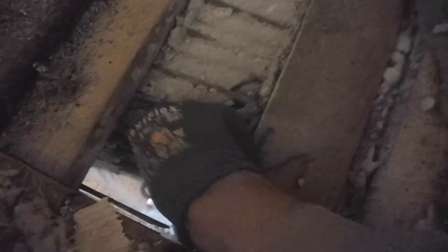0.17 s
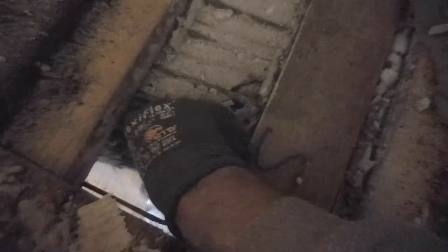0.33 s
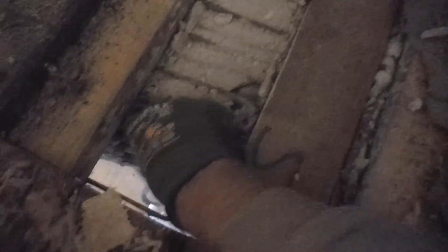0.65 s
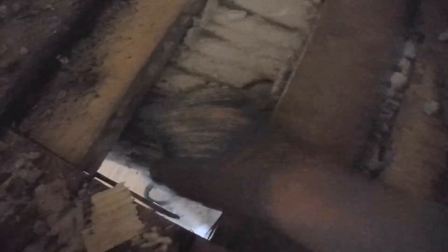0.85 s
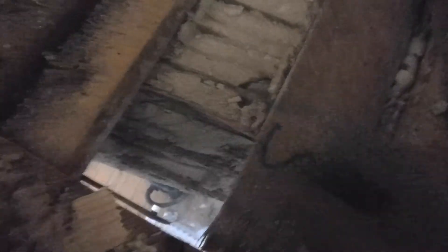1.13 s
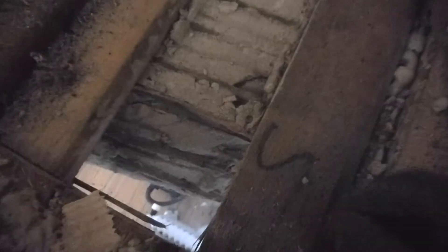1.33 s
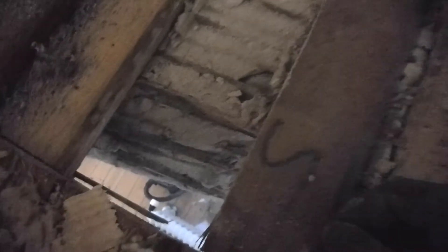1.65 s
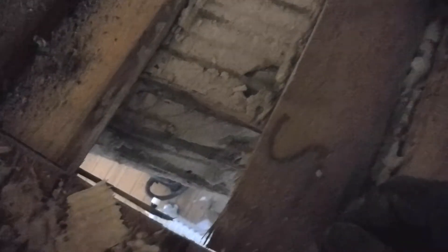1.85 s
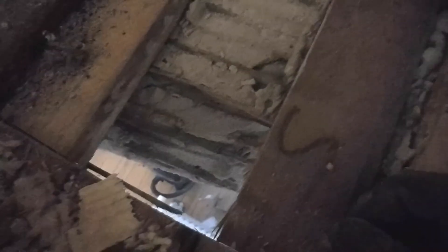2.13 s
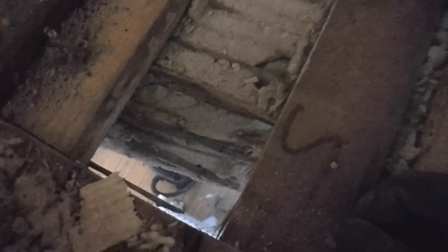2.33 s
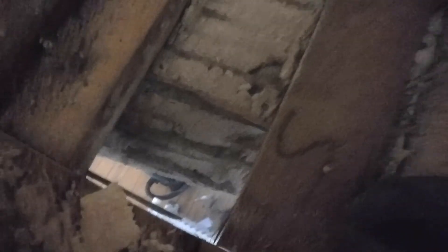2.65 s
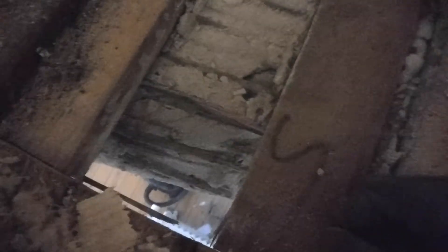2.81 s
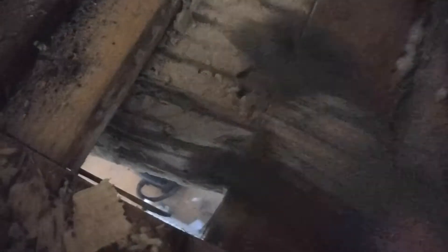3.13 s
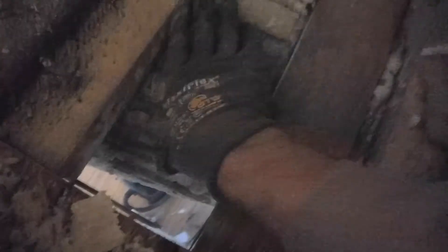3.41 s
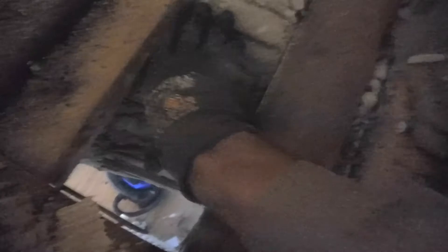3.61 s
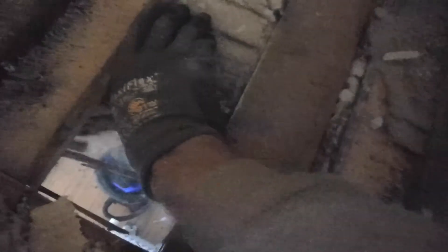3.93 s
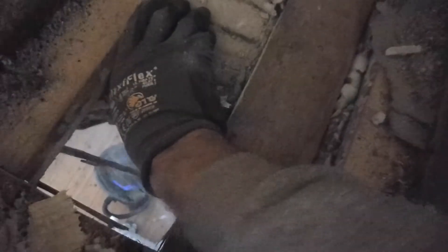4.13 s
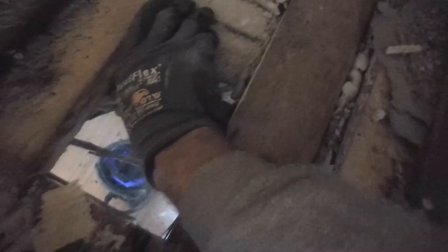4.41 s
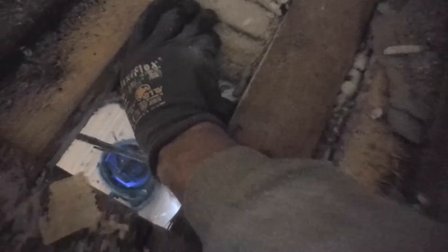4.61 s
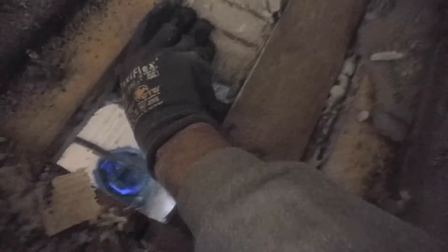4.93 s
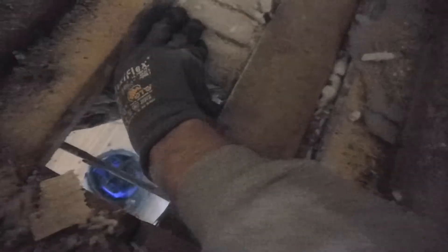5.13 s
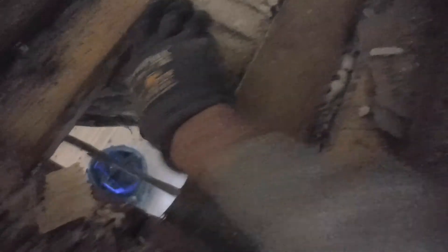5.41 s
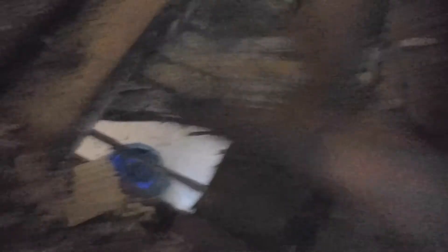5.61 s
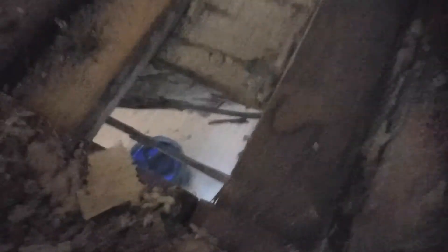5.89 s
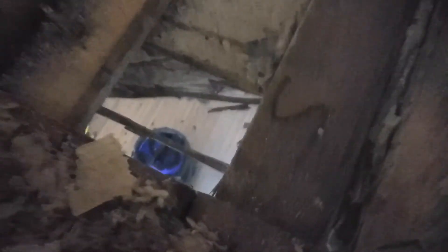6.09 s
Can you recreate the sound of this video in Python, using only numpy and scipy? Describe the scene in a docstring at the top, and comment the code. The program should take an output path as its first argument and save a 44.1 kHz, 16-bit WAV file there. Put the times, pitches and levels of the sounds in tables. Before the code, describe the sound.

Close, sharp snaps and dry crumbling open abruptly as a gloved hand breaks old plaster from laths in an attic. Debris then drops through a hole and clatters in a bare, echoing room below. After a quieter pause, soft joist thumps and a glove scrape lead into a second, denser burst of cracking, more falling chips with a brief hard clang, then scattered snaps and a last trickle. The close microphone hears the hand leaning slightly right.

```python
"""Sharp snaps and dry crumbling come first, close to the microphones: in an attic, a gloved hand breaks
old plaster and insulation out of the laths. Bursts, short modes and showers of tiny rings make these.
Debris drops through the hole into the bare room below: scattered hits, coloured and drawn out by echoes.
Now and then a sleeve brushes or the glove scrapes, as shaped noise and stick-slip clicks; joists thump
softly as the body leans. Quick attic reflections surround the near work, over a faint bed of air noise."""
import sys
import numpy as np
from scipy import signal
from scipy.fft import rfft, irfft
from scipy.io import wavfile
from scipy.ndimage import uniform_filter1d

SR = 44100
rng = np.random.default_rng(int(sys.argv[2]) if len(sys.argv) > 2 else 0)


def persist_wave(psi):
    """Save psi, clipped to +-1, as 16-bit WAV."""
    counts = np.round(np.clip(psi, -1, 1) * 32767).astype(np.int16)
    wavfile.write(sys.argv[1], SR, np.atleast_2d(counts).T)


N = 275669
TIME = np.arange(N) / SR
CUTOFF_HZ = 16300   # nothing is kept above this

# Flakes that follow a snap: mean delay, level re the snap, middle pitch
FLAKE_DELAY_S, FLAKE_DB, FLAKE_HZ = .018, -20.5, 8300
LATH_SHARE = 0.414   # the lath knock lies this far from the crack's level towards the joist's
# Pieces snapping at the hand, close by; levels are relative.
# Columns: t/s, crack/dB, treble shelf re crack/dB, joist thump/dB, ring of the piece f/Hz, ring height/dB
SNAP_EVENTS = [(0.02, 6, -6, 10, 8980, 5), (0.0246, 5.5, -3.5, -22.5, 5060, -1),
               (0.0394, 9, -11, 5.5, 3410, -1.5), (.0422, 4, -3.5, 4.5, 11170, 8),
               (0.0487, -6.5, 4, 1.5, 9970, 2.5), (.068, -8, -15.5, -4, 2170, 9),
               (0.0806, -6.5, 17, -1.5, 7540, 0), (.09, 9, -8.5, 2.5, 2794, 6.5),
               (0.1533, -1, -2, -15.5, 9550, 3), (0.1768, 11.5, -3.5, 11.5, 2299, 20),
               (0.1945, -6.5, 6, 2.5, 10000, 5), (0.1987, -16, 10, -3.5, 7360, 19),
               (0.2631, -2, 3.5, -3.5, 6598, -1), (0.3143, -15, 5, -35, 9040, 12),
               (0.3777, -7, -7, -37.5, 2930, 8), (0.495, -10, 1, -8.5, 8790, 17),
               (.545, -17, 11, -30, 10000, 13), (0.5994, 2, -2.5, -16, 7110, 4),
               (0.813, -11.5, 1.5, -25, 2985, 11), (1.964, -9.5, -1, -19.5, 2425, 10.5),
               (2.409, -28.5, 1.5, -40, 4640, 3.5), (3.2626, -8, -6, -34, 2078, 15),
               (3.403, -1.5, 1, 4.5, 8680, 8.5), (3.44, 1.5, -2.5, -0.5, 9140, 5.5),
               (3.4525, -6.5, 6, -11, 9580, 1), (3.5253, 4.5, -6, 6, 3560, 2),
               (3.5288, -3, 5.5, -1, 8700, 7), (3.5835, -6, -6.5, -18.5, 3256, 8),
               (3.6886, 2.5, -6.5, -6.5, 2912, 9), (3.7191, 5.5, -7.5, -1, 5560, 15.5),
               (3.773, -4, 3.5, -28, 9200, 7), (3.7779, -2, 3.5, -30, 5920, 3.5),
               (3.7845, -5, 9, -4.5, 8450, 5), (3.8077, 4, 0, 11.5, 3750, 3.5),
               (3.8287, 3, 3, 6.5, 2952, 11), (3.8453, 4.5, -3.5, 9, 1274, 13),
               (3.8633, 6.5, -1, -4.5, 4040, 7), (3.8679, 9.5, 1.5, 12, 1366, 11),
               (3.8892, 8, -4, 11, 9220, 9), (3.912, -4, 13.5, 10.5, 6500, -11.5),
               (3.9475, 8.5, -8, 7, 3414, 4.5), (3.9693, 7, -5.5, 5, 3475, 8.5),
               (4.0371, -8.5, 2.5, -28.5, 3340, 17.5), (4.0983, -12.5, 13, -11, 8600, -0.5),
               (4.2372, -6.5, -13, -34, 3960, 8), (4.245, 1, -14.5, -24.5, 3990, -10.5),
               (4.271, -1.5, -2.5, -9, 8890, -0.5), (4.3024, -9.5, 6, 3.5, 9230, 7),
               (4.3163, -1.5, -21, -5.5, 1452, 10.5), (4.3316, 3.5, -18, -9.5, 2920, -13.5),
               (4.359, -11.5, 4, -30.5, 3400, 8), (4.5946, 3.5, -10.5, -11.5, 4370, 3.5),
               (5.0027, -8.5, 4.5, -25.5, 2230, 13.5), (5.0625, 1.5, -9, -6, 7640, 5),
               (5.0992, 4, -8.5, -36.5, 2967, 7), (5.215, -19, 11, -37, 8700, 3),
               (5.2411, 0, 1.5, 1, 2406, 13.5), (5.7085, 2.5, -15.5, -44, 1473, 8.5)]


def snaps(crack_db=-2.5, knock_db=-15, thump_db=3, thump_t60=0.03, size=3000):
    """A fracture cracks and rings the piece, knocks the laths, thumps the joist and sheds a flake."""
    out, t = np.zeros((2, N)), np.arange(size) / SR
    for s, db, treble_db, joist_db, ring_hz, ring_db in SNAP_EVENTS:
        piece = from_db(db + crack_db) * crack(t, treble_db, ring_hz, ring_db)
        piece += from_db(db + PIECE_RING_DB + .5 * ring_db) * piece_ringing(t, ring_hz)
        lath_db = db + LATH_SHARE * (joist_db - db)
        knock = from_db(lath_db + knock_db) * lath_knock(t)
        blow = from_db(joist_db + thump_db) * thump(t, thump_t60)
        add(out, s, piece + knock + blow)

        flake_hz = FLAKE_HZ * 2 ** (rng.random() - .5)
        flake = crack(t, treble_db=-6, ring_hz=flake_hz, ring_db=7.5)
        delay = FLAKE_DELAY_S * (.5 + rng.random())
        add(out, s + delay, from_db(db + FLAKE_DB) * flake)
    return out


# A piece that rings higher dies sooner: reference pitch, its decay, and how decay follows pitch
PIECE_HZ, PIECE_T60_S, T60_OCTAVES_PER_OCTAVE = 3000, 0.0183, -.33
# Basic colour of a crack. Columns: f/Hz, relative level/dB
CRACK_SPECTRUM = [(100, -26.5), (700, -1), (1600, -1), (4000, 3.5), (9500, 0.5), (12500, -5), (16000, -19)]


def crack(t, treble_db, ring_hz, ring_db, ring_share=0.337, rise_s=0.00031):
    """A fast-opening, decaying noise burst rings the piece in a close pair of resonances."""
    t60 = PIECE_T60_S * (ring_hz / PIECE_HZ) ** T60_OCTAVES_PER_OCTAVE
    opening = (1 - np.exp(-t / rise_s)) * from_db(-60 * t / t60)
    burst = unit_energy(stereo_noise(len(t), NEAR_LIKENESS) * opening)
    width = ring_share * ring_hz
    pair = [(ring_hz, width, ring_db), (1.2 * ring_hz, .5 * width, 0.11 * ring_db)]
    return coloured(burst, CRACK_SPECTRUM, pair, treble_db + 1.5, size=1024)


PIECE_RING_CYCLES, PIECE_RING_DB = 65, -16.5   # cycles to fall 60 dB; base level re the crack
# Modes of a broken piece. Columns: multiple of its pitch, relative level/dB
BROKEN_PIECE_MODES = [(1, 1), (1.38, -3), (2.48, -5)]


def piece_ringing(t, ring_hz):
    """The loose piece rings on for a moment, each mode dying after the same number of cycles."""
    modes = []
    for multiple, db in BROKEN_PIECE_MODES:
        hz = ring_hz * multiple
        if hz < CUTOFF_HZ:
            modes.append((hz, db, PIECE_RING_CYCLES / hz))
    return ringing(modes, t)


# Modes of the laths. Columns: f/Hz, relative level/dB, t60/s
LATH_MODES = [(378.7, -4, 0.0556), (376.1, -4.5, 0.0833), (518.5, -2.5, 0.056), (571.9, -1.5, 0.068),
              (638, 0, 0.033), (828.2, 2.5, 0.0483), (1004.3, 3.5, 0.023), (1176, -4, 0.0256),
              (1530, 3, 0.013)]


def lath_knock(t):
    """The struck laths sound their short modes, a little detuned at each blow."""
    return ringing(LATH_MODES, t, detune=.06)


# Dull colour of the joist. Columns: f/Hz, relative level/dB
THUMP_SPECTRUM = [(15, -5.5), (40, -5), (80, -5), (140, -6.5), (230, -3.5), (400, -11.5), (1000, -31.5),
                  (4000, -71)]


def thump(t, t60):
    """A dull blow carried by the joist."""
    blow = stereo_noise(len(t), 0.06) * from_db(-60 * t / t60)
    return coloured(unit_energy(blow), THUMP_SPECTRUM)


# Colour of the crumbs. Columns: f/Hz, relative level/dB
CRUMB_SPECTRUM = [(30, -2.5), (130, -11.5), (260, -4.5), (400, 6.5), (1100, 6.5), (2000, 3.5), (3800, 3),
                  (6000, 1.5), (9500, 4.5), (12500, 0.5), (16000, -18.5)]


def crumbling(per_s=1000, spread_db=3.5, grain_t60=0.007, level_db=-1, count=6, size=400):
    """Crumbs break one by one, more as the hand pulls harder; each size has its own short ring."""
    db = crumbling_db()
    rate = per_s * from_db(0.82 * (db + 44))
    t, out = np.arange(size) / SR, 0
    for hz in np.geomspace(2200, 10500, count):
        tick = stereo_noise(size, NEAR_LIKENESS) * from_db(-60 * t / grain_t60)
        resonance = [(hz, 0.56 * hz, 10)]
        tick = unit_energy(coloured(tick, [(100, 0.0044), (16000, 0.0043)], resonance, size=512))
        breaks = grains(N, rate / count, spread_db)[None]
        out = out + signal.oaconvolve(breaks, tick, axes=-1)[:, :N]
    return coloured(evened(out, size=2000) * from_db(db + level_db), CRUMB_SPECTRUM)


CRUMBLE_GAIN_DB, TRICKLE_DB_PER_S2 = 5, 10.5   # after a pull the crumbs trickle away, ever faster
CRUSH_RISE_DB_PER_S, CRUSH_FALL_DB_PER_S = 248, 120
# Plaster crumbling under the fingers, one list a pull. Columns: t/s, relative level/dB
CRUMBLE_PULLS = [
    [(0.0, -43.5), (0.11, -55), (0.234, -60.5), (0.404, -52.5), (0.508, -56), (0.668, -49.5), (0.806, -47),
     (0.95, -53.5)],
    [(3.15, -69), (3.242, -69), (3.374, -62.5), (3.462, -50.5), (3.574, -45.5), (3.88, -47), (4.068, -58),
     (4.314, -50), (4.43, -57)],
    [(4.9, -58), (5.084, -50), (5.356, -56), (5.522, -64.5), (5.732, -64.5), (5.902, -57.5), (6.2, -64.5)],
]
# Lumps crushed in the fist. Columns: t/s, relative level/dB
FIST_CRUSHES = [(0.209, -35), (3.888, -23.5), (4.161, -40.5)]


def crumbling_db():
    """The loudest of the pulls, their trickles and the crushed lumps sets the level at each moment."""
    levels = []
    for rows in CRUMBLE_PULLS:
        pull = np.interp(TIME, *np.transpose(rows), left=-100) + CRUMBLE_GAIN_DB
        since_end = np.maximum(TIME - rows[-1][0], 0)
        levels.append(pull - TRICKLE_DB_PER_S2 * since_end ** 2)
    for s, db in FIST_CRUSHES:
        levels.append(db - np.maximum(CRUSH_RISE_DB_PER_S * (s - TIME), CRUSH_FALL_DB_PER_S * (TIME - s)))
    return np.max(levels, axis=0)


NEAR_LIKENESS = 0.1   # left-right likeness of the close noises before they are placed
# How the work of the hand reaches the microphones. Columns: f/Hz, side re mid level/dB
HAND_WIDTH = [(100, -0.5), (700, -8), (2000, -5.5), (4500, -3.5), (8000, -1)]
# Columns: f/Hz, left re right level/dB
HAND_PAN = [(100, -4), (1200, -5), (3500, -7), (7000, -1), (13000, -1.5)]


def at_the_hand(x):
    """Close sounds reach both sides alike in the middle range, leaning right; their treble is diffuse."""
    mid = (x[:1] + x[1:]) / 2
    side = coloured((x[:1] - x[1:]) / 2, HAND_WIDTH, size=512)
    left = coloured(mid + side, [(hz, db / 2) for hz, db in HAND_PAN], size=512)
    right = coloured(mid - side, [(hz, -db / 2) for hz, db in HAND_PAN], size=512)
    return np.vstack([left, right])


# Debris landing below; levels are relative. Columns: t/s, scatter time/s, first hit re scatter/dB,
# heavy lump level/dB, chips level/dB, fine grit level/dB
DEBRIS_FALLS = [(.295, 0.0187, 2, 1, -1.5, -30.5), (.459, 0.0052, -6, -20.5, 1, 0.5),
                (.75, 0.041, -21.5, -2, -12.5, 2), (.83, 0.00457, -14.5, 5, 12.5, 0),
                (.992, 0.0074, -4, 0.5, 10, 12.5), (1.015, 0.0036, 4.5, -19.5, 10.5, 4.5),
                (1.121, 0.23, -19, -7, 0, 8.5), (1.247, .022, -13.5, -0.5, -3, -2.5),
                (1.321, 0.0234, -21, -15.5, -12, 6.5), (1.346, 0.0116, -9, 3, 7, 15.5),
                (1.405, 0.00286, 5.5, 14, 17, -9), (1.6377, 0.021, 10.5, 33, 16, 2),
                (1.905, 0.0324, 0.5, -2, 2.5, 1), (2.218, 0.0051, 11, -15, -25.5, -9.5),
                (4.438, 0.01015, 2.5, -23, -4, 11.5), (4.501, 0.0083, -2.5, -19, 19, 13),
                (4.59, 0.103, -10, 14, 17, 21), (4.681, 0.0102, 0, 9.5, 23, 17),
                (4.96, 0.0641, -11, -6, 2.5, -20.5), (5.404, 0.0127, 5.5, 1.5, 9.5, 3.5),
                (5.418, 0.0049, 0.5, -20.5, 10, 7), (6.205, 0.0084, 6, -2, -14.5, 10)]
# Colours of the three kinds of debris. Columns: f/Hz, relative level/dB
LUMP_SPECTRUM = [(25, -62.5), (90, -35), (180, -21.5), (330, -16.5), (520, -7), (800, 1), (1080, 3),
                 (1500, 0), (2300, -6.5), (3500, -19.5), (6000, -32), (15000, -56.5)]
CHIP_SPECTRUM = [(40, -55.5), (250, -26), (450, -11), (800, -9), (1150, -5), (2200, 0), (3800, -4.5),
                 (6000, -22), (15000, -51)]
GRIT_SPECTRUM = [(40, -41), (300, -20), (650, -18.5), (2000, -8.5), (3800, -1.5), (6500, -10.5),
                 (9500, -11), (12500, -17.5), (15500, -39.5)]
# Resonances of the hole and the joist bay. Columns: f/Hz, width/Hz, level/dB
BAY_RESONANCES = [(503, 27, -0.5), (775, 64, 0.5), (940, 25.3, 0.5), (1104, 50, 1), (1118.8, 54, 4),
                  (2166, 93, 2)]


def falling_debris(per_s=1200, direct_db=-13, level_db=-1, size=12000):
    """Each handful hits the floor and scatters: lumps thud, chips clatter, grit hisses."""
    t, out = np.arange(size) / SR, np.zeros((2, N))
    for k, spectrum in enumerate([LUMP_SPECTRUM, CHIP_SPECTRUM, GRIT_SPECTRUM]):
        hits = np.zeros((1, N))
        for s, scatter, first_db, *levels_db in DEBRIS_FALLS:
            fading = np.exp(-t / (2 * max(scatter, .002)))
            shower = unit_energy(grains(size, per_s, 9.7) * fading)
            shower[0] += from_db(first_db - 4.4 * k)   # finer stuff has a weaker leading hit
            add(hits, s, from_db(levels_db[k]) * unit_energy(shower))
        path = room_below()   # each kind has its own pattern of echoes
        path[:, :1] += panned(from_db(direct_db), -2)
        out += signal.fftconvolve(hits, coloured(path, spectrum, BAY_RESONANCES), axes=-1)[:, :N]
    return from_db(level_db) * (out + clangs())


# Chips striking something hard below. Columns: t/s, relative level/dB
CLANG_EVENTS = [(4.5, -1), (4.681, 10.5), (5.416, -14)]
# Modes of that hard thing on the floor. Columns: f/Hz, relative level/dB, t60/s
HARD_THING_MODES = [(1126, 2.5, 0.575), (1209.6, 2.5, 0.39), (1422, 14.5, 0.0484), (1609, 7, 0.196),
                    (1927, -3.5, 0.93), (1948, -3, 0.78), (2057, -6.5, 0.7), (2281, -2.5, 0.716),
                    (2400, 1.5, 0.495)]


def clangs(ring_db=2.5, swell_s=0.0011):
    """Struck by chips, something hard below swells quickly into its ringing modes."""
    out, t = np.zeros((2, N)), TIME[:SR]
    swell = 1 - np.exp(-t / swell_s)
    ring = panned(ringing(HARD_THING_MODES, t) * swell, -1.6)
    for s, db in CLANG_EVENTS:
        add(out, s, from_db(db + ring_db) * ring)
    return out


# Late decay of the room below. Columns: f/Hz, t60/s
BELOW_T60 = [(150, 0.81), (400, 0.86), (1100, 0.7554), (3000, 0.7682), (9000, 0.61), (15000, 0.01)]
# How its echoes reach the microphones. Columns: f/Hz, left-right likeness
BELOW_LIKENESS = [(100, 1), (800, 0.978), (1600, 0.983), (2500, 0.7), (4500, 0.43), (10000, 0.94)]
# Columns: f/Hz, left re right level/dB
BELOW_PAN = [(100, -4.5), (1400, -3), (2400, -6.5), (4500, -7), (9000, -.5)]


def room_below(early_db=6, early_t60=0.1136, size=40000):
    """Dense echoes come up through the hole in two decays, the top treble dying first."""
    t, out = np.arange(size) / SR, 0
    hz = np.fft.rfftfreq(size, 1 / SR)
    edges = np.append(0, np.geomspace(150, SR / 2, 15))
    for low, high in zip(edges, edges[1:]):
        centre = (low + high) / 2
        noise = stereo_noise(size, at_hz(BELOW_LIKENESS, centre))
        band = irfft(rfft(noise) * ((hz >= low) & (hz < high)), size)
        late = from_db(-60 * t / at_hz(BELOW_T60, centre))
        early = from_db(early_db - 8.0 - 60 * t / early_t60)
        echoes = panned(unit_energy(band * (late + early)), at_hz(BELOW_PAN, centre))
        out = out + echoes * np.sqrt(2 * (high - low) / SR)   # equal energy per Hz
    return out


# Sleeve and glove brushing the timber. Columns: start t/s, length/s, relative peak level/dB
BRUSH_STROKES = [(2.885, 0.128, -53), (3.17, 0.259, -56.5), (4.262, 0.0623, -50), (4.56, 0.099, -39),
                 (5.8, 0.1203, -44.5), (5.925, 0.0323, -48), (5.975, 0.0608, -54)]
# Colour of the cloth. Columns: f/Hz, relative level/dB
CLOTH_SPECTRUM = [(40, -42), (170, -19.5), (320, -4.5), (600, 5.5), (1300, 0.5), (2500, 3.5), (5000, -2),
                  (10000, -3), (15500, -20.5)]
# Resonances of the brushed timber. Columns: f/Hz, width/Hz, level/dB
TIMBER_RESONANCES = [(323.7, 99, 8), (593, 29, 4.5), (1254, 194, 7.5), (1490, 72, 0), (2260, 247, 3.5),
                     (2812, 135, 3.5)]


def sleeve(level_db=10, catches_per_s=700, smooth_share=0.357):
    """Cloth fibres catch and slip on rough wood and set it sounding."""
    level = strokes(BRUSH_STROKES, skew=1.083, sharpness=0.804) * from_db(level_db)
    catches = signal.lfilter([1], [1, -.9], np.abs(grains(N, catches_per_s, 1.1)))
    rub = stereo_noise(N, 0.435) * (smooth_share + 0.37 * catches)
    return panned(coloured(evened(rub, size=3000) * level, CLOTH_SPECTRUM, TIMBER_RESONANCES), -7)


# The glove scraping into place on the laths. Columns: start t/s, length/s, peak level before panning/dB
GLOVE_SCRAPES = [(3.168, 0.079, -49.5), (3.24, 0.139, -46)]
# Resonances of the scraped plaster edge. Columns: f/Hz, relative level/dB, t60/s
PLASTER_EDGE_MODES = [(1277, 1, 0.018), (1495, 0, 0.043), (1957, 1.5, 0.0162), (2380, -2.5, 0.034),
                      (2734, -2, 0.0203), (3980, 7, 0.0049)]


def glove(slips_per_s=450, spread_db=4, size=2500):
    """The rubber palm sticks and slips on the plaster edge; each slip rings the edge."""
    edge = ringing(PLASTER_EDGE_MODES, np.arange(size) / SR)
    slips = grains(N, slips_per_s, spread_db)[None]
    rub = signal.oaconvolve(slips, edge, axes=-1)[:, :N]
    return panned(evened(rub, size=1500) * strokes(GLOVE_SCRAPES, skew=0.76, sharpness=0.52), -6.0)


def strokes(rows, skew, sharpness):
    """Each stroke speeds up and slows down in one arch."""
    level = 0
    for s, length, db in rows:
        progress = np.clip((TIME - s) / length, 0, 1)
        level = level + from_db(db) * np.abs(np.sin(np.pi * progress ** skew)) ** sharpness
    return level


# Weight shifting on the joists. Columns: t/s, relative level/dB
WEIGHT_SHIFTS = [(2.7, -26), (2.8, -20.5), (2.881, -12), (2.985, -10), (3.16, -19), (4.936, -22),
                 (5.782, -9), (5.869, -11)]


def shifting_weight(t60=0.098, level_db=3, size=12000):
    """The joists answer softly as the body leans."""
    out = np.zeros((2, N))
    for s, db in WEIGHT_SHIFTS:
        add(out, s, from_db(db + level_db) * thump(np.arange(size) / SR, t60))
    return out


def attic(x, near_db=-16, near_t60=0.069, far_db=-21, far_t60=0.46, size=16000):
    """Quick reflections between the joists, then a faint tail under the roof."""
    t, echoes = np.arange(size) / SR, 0
    for db, t60 in [(near_db, near_t60), (far_db, far_t60)]:
        tail = stereo_noise(size, 0.76) * from_db(-60 * t / t60) * (t > .002)
        echoes = echoes + from_db(db) * unit_energy(tail)
    return x + signal.fftconvolve(x, echoes, axes=-1)[:, :N]


# Colour of the air. Columns: f/Hz, relative level/dB
AIR_SPECTRUM = [(25, -10.5), (90, -16.5), (150, -18.5), (300, -11), (550, -6), (900, -6), (1200, -5.5),
                (1600, -8), (4000, -13), (14000, -29), (16000, -35)]


def air(level_db=-60):
    """Steady coloured noise with one broad resonance lies behind everything."""
    noise = coloured(stereo_noise(N, 0.27), AIR_SPECTRUM, [(1160, 180, 3.5)])
    return panned(from_db(level_db) * np.sqrt(N) * unit_energy(noise), -1)


def from_db(db):
    """Amplitude ratio of a level in dB."""
    return np.exp(np.asarray(db) * (np.log(10) / 20))


def unit_energy(x):
    """Scale so that the mean channel holds energy 1."""
    return x / np.sqrt(np.mean(np.sum(x ** 2, axis=-1)) + 1e-20)


def at_hz(points, hz):
    """Read a table on a log-frequency axis."""
    f, value = np.transpose(points)
    return np.interp(np.log(np.maximum(hz, 1)), np.log(f), value)


def add(out, s, sound):
    """Mix a sound in at time s."""
    i = max(0, round(s * SR))
    out[..., i:i + sound.shape[-1]] += sound[..., :max(0, N - i)]


def panned(x, pan_db):
    """Set left re right level at constant power; negative leans right."""
    sides = from_db(np.array([[.5], [-.5]]) * pan_db)
    return x * sides / np.sqrt(np.cosh(pan_db * np.log(10) / 20))


def stereo_noise(size, likeness):
    """Two white noises that share a part."""
    c = np.clip(likeness, -.99, .99)
    mid, side = rng.standard_normal((2, size))
    return np.sqrt((1 + c) / 2) * mid + np.sqrt((1 - c) / 2) * side * np.array([[1], [-1]])


def coloured(x, spectrum, peaks=(), shelf_db=0, size=4096):
    """Causal (minimum-phase) filter from a spectrum, resonance peaks and a treble shelf."""
    hz = np.fft.rfftfreq(size, 1 / SR)
    db = at_hz(spectrum, hz) + shelf_db * at_hz([(3500, 0), (7500, 0.711)], hz)
    for centre, width, peak_db in peaks:
        db = db + peak_db / (1 + (2 * (hz - centre) / width) ** 2)
    # folding the cepstrum forward in time gives the minimum phase
    cepstrum = irfft(db * np.log(10) / 20)
    cepstrum[1:size // 2] *= 2
    cepstrum[size // 2 + 1:] = 0
    response = irfft(np.exp(rfft(cepstrum)))
    return signal.fftconvolve(x, response[None], axes=-1)[:, :x.shape[-1]]


def grains(size, per_s, spread_db):
    """Random clicks of either sign, many small and a few large."""
    born = rng.random(size) < per_s / SR
    strength = rng.exponential(1, size)[born]
    sign = np.sign(rng.random(size)[born] - .5)
    clicks = np.zeros(size)
    clicks[born] = sign * from_db(spread_db * np.minimum(strength, 3.5))
    return clicks


def evened(x, size):
    """Hold the running power near 1, keeping the fine grain."""
    power = uniform_filter1d(np.mean(x ** 2, axis=0), size)
    return x / np.sqrt(np.maximum(power, 1e-9))


def ringing(modes, t, detune=0):
    """Decaying sines of a struck body, energy 1, with slightly different phases at each side."""
    out = 0
    for hz, db, t60 in modes:
        turn = 2 * np.pi * hz * (1 + detune * rng.normal()) * t
        wave = np.sin(turn + rng.normal(0, 0.4, (2, 1))) * rng.choice([-1, 1])
        out = out + from_db(db - 60 * t / t60) * wave
    return unit_energy(out)


def scene():
    """Near work in the attic, debris in the room below, and the air behind."""
    hand = at_the_hand(snaps() + crumbling())
    close_by = hand + sleeve() + glove() + shifting_weight()
    return attic(close_by) + falling_debris() + air()


def record(dry):
    """The highest peaks are rounded and the top is cut."""
    rounded = 1.1718 * np.tanh(dry / 1.2114)
    lowpass = signal.ellip(10, .2, 90, CUTOFF_HZ, fs=SR, output="sos")
    return signal.sosfilt(lowpass, rounded)


dry = scene()
out = record(dry)
persist_wave(out)
```